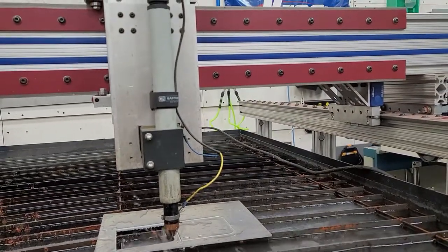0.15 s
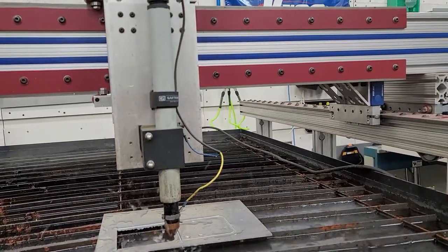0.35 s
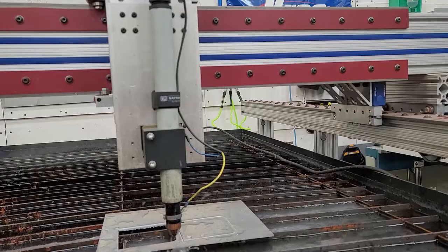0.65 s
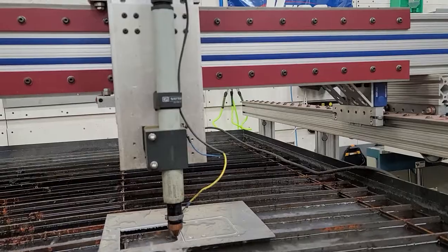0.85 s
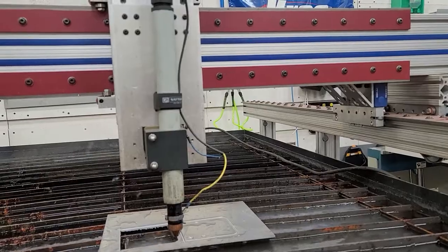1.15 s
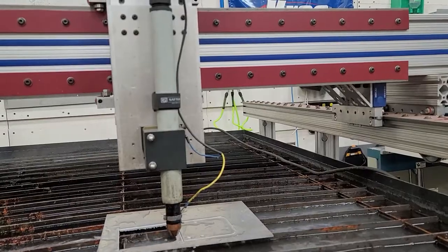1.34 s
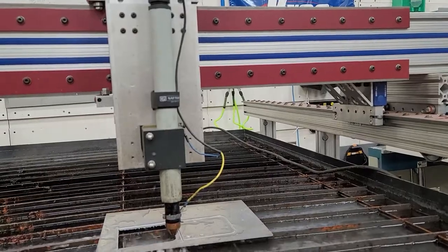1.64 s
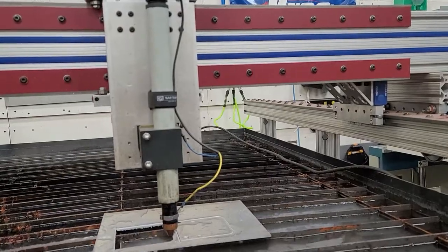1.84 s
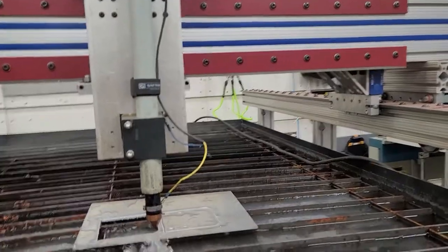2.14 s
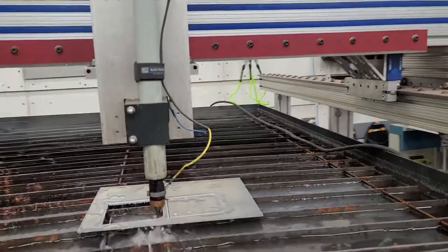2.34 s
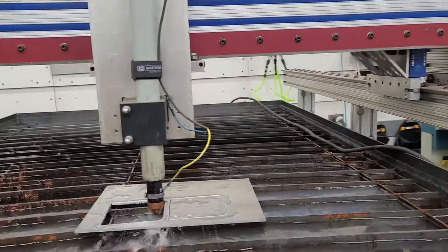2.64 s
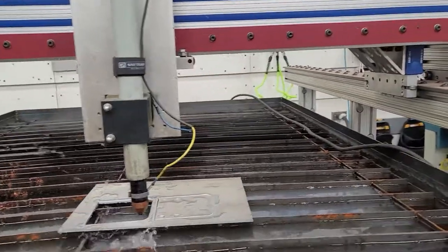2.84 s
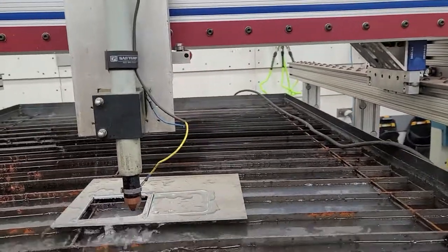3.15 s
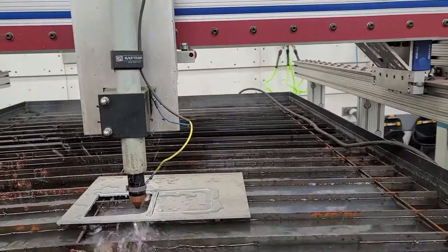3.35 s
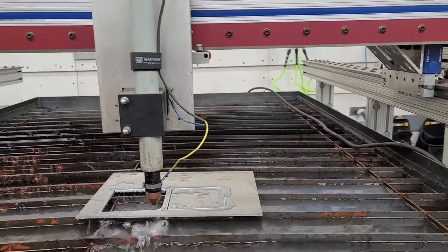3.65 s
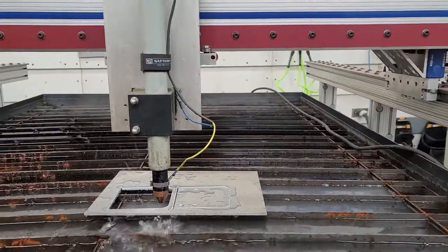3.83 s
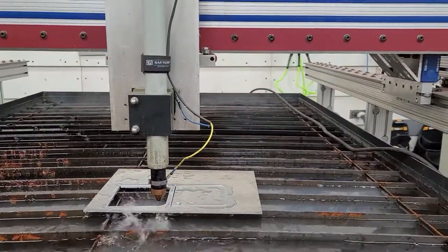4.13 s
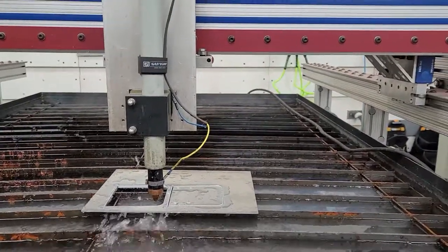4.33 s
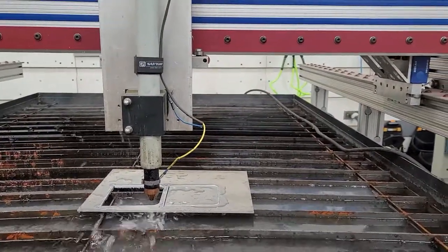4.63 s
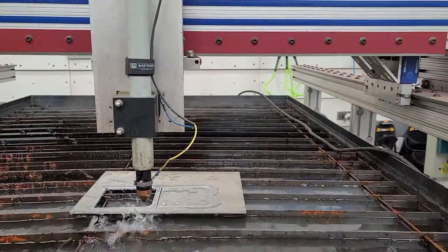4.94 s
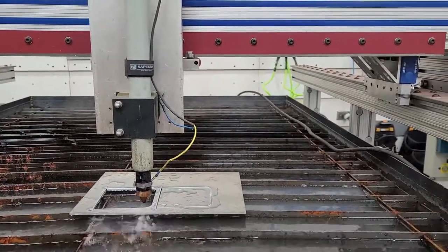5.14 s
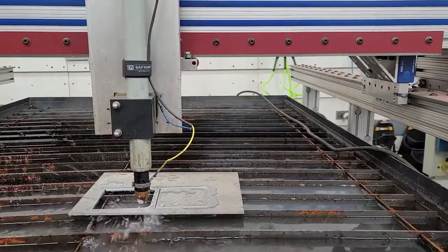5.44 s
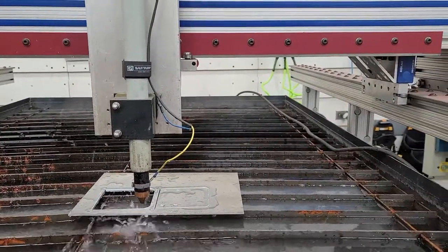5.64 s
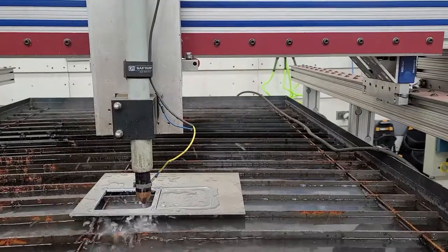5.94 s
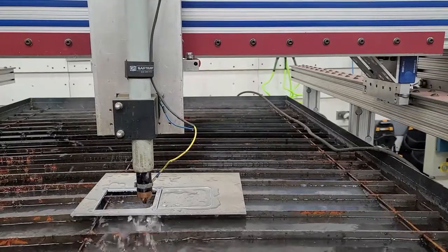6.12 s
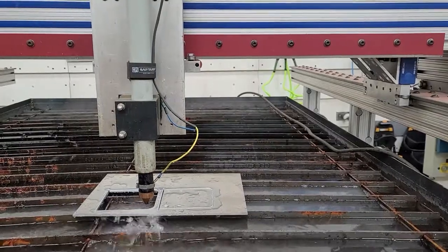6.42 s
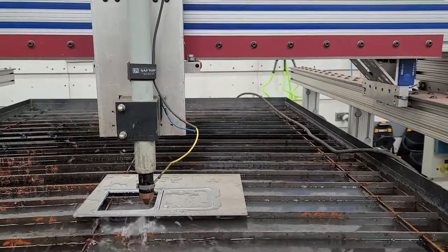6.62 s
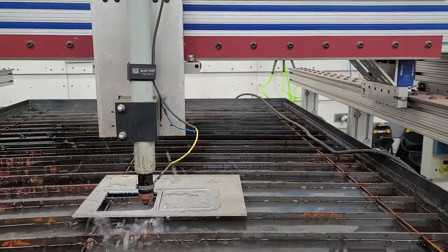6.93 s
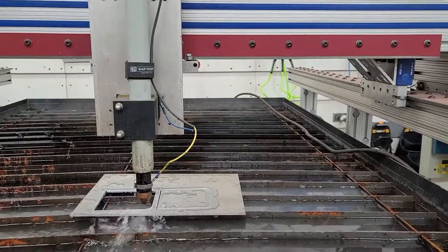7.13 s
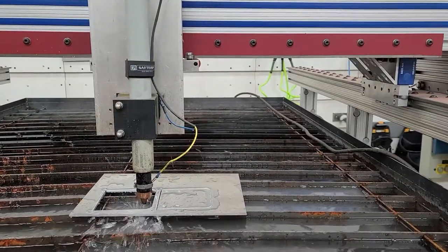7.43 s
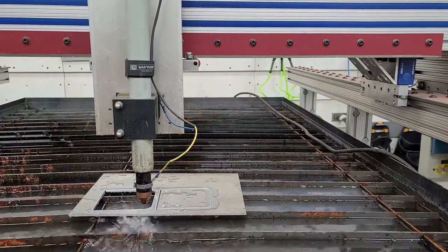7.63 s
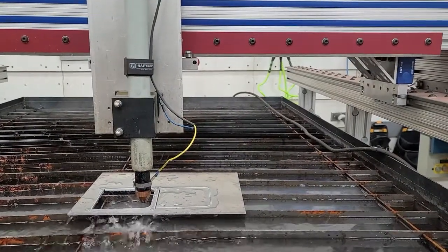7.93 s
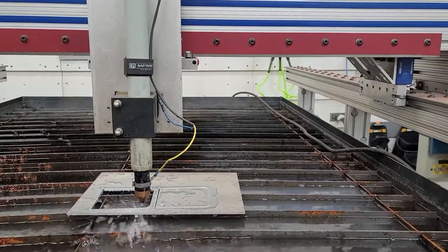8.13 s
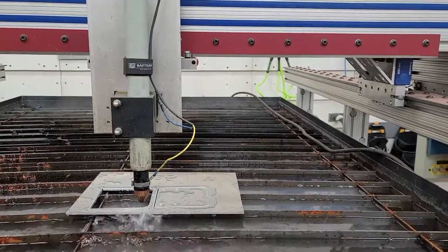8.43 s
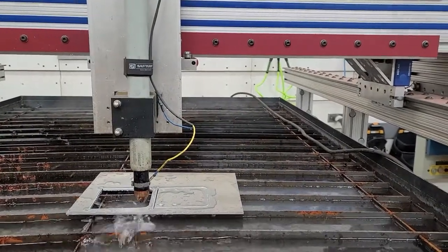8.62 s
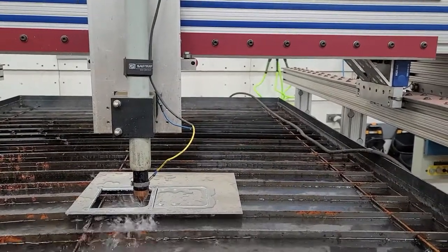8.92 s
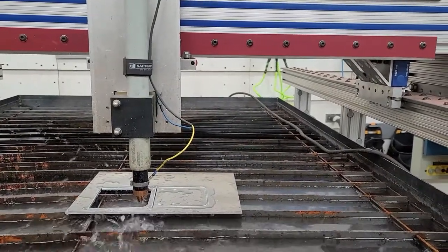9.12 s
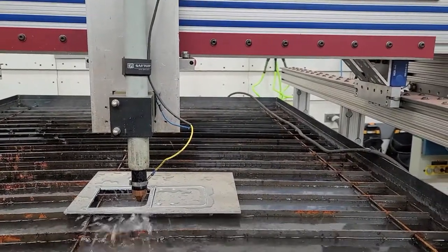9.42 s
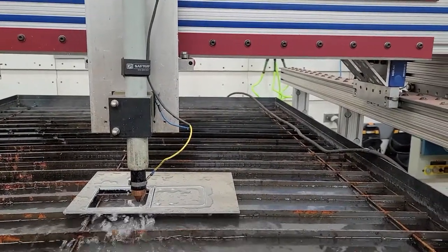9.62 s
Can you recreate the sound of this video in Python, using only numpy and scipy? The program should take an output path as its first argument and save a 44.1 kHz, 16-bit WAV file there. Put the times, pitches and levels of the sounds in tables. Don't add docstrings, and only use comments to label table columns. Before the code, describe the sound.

A constant bright roar of air with a fluttering whistle near 3 kHz and watery spray; early droplets thump the microphone on the left.

```python
import sys
import numpy as np
from scipy import signal
from scipy.io import wavfile
from scipy.ndimage import uniform_filter1d

SR = 44100
rng = np.random.default_rng(int(sys.argv[2]) if len(sys.argv) > 2 else 0)


def amplitude_ratio(level_db):
    exponent = np.asarray(level_db, float) / 20
    return 10 ** exponent


def dump_mix(stems):
    frames = np.atleast_2d(stems).T
    limited = np.clip(frames, -1, 1)
    pcm = np.round(limited * 32767).astype(np.int16)
    wavfile.write(sys.argv[1], SR, pcm)


N = 430857


def evened(x):
    return x / np.sqrt(np.mean(x ** 2) + 1e-20)


def read(points, hz):
    point_hz, value = np.transpose(points)
    return np.interp(np.log(hz + 1), np.log(point_hz + 1), value)


def follow(points, x):
    return np.interp(x, *np.transpose(points))


def humps(modes, hz):
    return sum(db / (1 + (2 * (hz - centre_hz) / width_hz) ** 2) for centre_hz, width_hz, db in modes)


def drift(shape, tall, long):
    smooth = uniform_filter1d(rng.standard_normal(shape), tall, 0)
    return evened(uniform_filter1d(smooth, long, 1))


def surges(rows, t):
    return sum(db * np.exp(-.5 * ((t - s) / half_s) ** 2) for s, db, half_s in rows)


def between_surges(rows, t):
    return np.prod([1 - np.exp(-.5 * ((t - s) / (1.3 * half_s)) ** 2) for s, db, half_s in rows], axis=0)


def drops():
    # start in seconds, lasting push, passing push (both as sample level),
    # fade of the passing push in ms, rise in ms.
    drop_hits = [
        (0.1355, -0.142, 0.068, 5.3, 0.1),
        (0.4281, 0.047, -0.047, 2.91, 2.9),
        (0.8125, -0.269, 0.248, 4.15, 0.1),
        (1.3135, -0.036, -0.02, 13.15, 0.1),
        (1.5399, 0.291, -0.198, 3.41, 0.1),
        (2.0588, -0.069, -0.079, 0.2, 0.1),
    ]
    # start in seconds, lasting push, passing push, fade in ms, rise in ms.
    slide_offs = [
        (1.586, -.012, .002, 4.1, 2.5),
        (1.642, -0.0097, .002, 4.1, 2.5),
    ]
    t = np.arange(N) / SR
    push = np.zeros((2, N))
    for start_s, lasting, passing, passing_ms, rise_ms in [*drop_hits, *slide_offs]:
        ms = np.maximum(t - start_s, 0) * 1000
        push[0] += (1 - np.exp(-ms / rise_ms)) * (lasting + passing * np.exp(-ms / passing_ms))
    cut = signal.butter(2, 29.7, "high", fs=SR, output="sos")
    return signal.sosfilt(np.vstack([cut, cut]), push)


def turbulence():
    # middle in seconds, level in dB, half-length in seconds.
    jet_gusts = [(0.12, 3.6, 0.025), (0.419, -2.6, 0.018), (1.093, 4.5, 0.012), (1.402, -2.9, 0.012),
                 (2.225, 2.8, 0.018), (2.35, 2.8, 0.025), (2.634, 1.8, 0.035), (3.163, -2.4, 0.018),
                 (3.273, 3.2, 0.012), (3.322, -4.5, 0.018), (3.442, 3.1, 0.018), (3.602, -2.9, 0.018),
                 (3.717, 4.6, 0.018), (3.851, 2.8, 0.018), (3.951, -2.7, 0.025), (4.834, -2.7, 0.012),
                 (5.044, -2.5, 0.018), (5.138, 2.0, 0.035), (5.722, 3.9, 0.018), (6.72, -3.5, 0.012),
                 (7.358, -2.3, 0.018), (7.438, 1.9, 0.025), (7.797, -3.1, 0.012), (7.927, 3.6, 0.018),
                 (8.012, 3.4, 0.012), (8.59, 3.0, 0.012), (8.64, -3.0, 0.012), (9.319, 2.8, 0.012),
                 (9.473, -2.6, 0.018), (9.708, 3.0, 0.012)]
    # middle in seconds, level in dB, half-length in seconds.
    whistle_gusts = [(0.364, 3.1, 0.018), (0.683, 2, 0.04), (1.591, -1.6, 0.07), (1.961, 2.0, 0.054),
                     (2.06, -5, 0.018), (2.549, 2.5, 0.025), (2.968, 3.3, 0.016), (3.098, 3.1, 0.018),
                     (3.183, -7, 0.018), (3.337, 5.1, 0.016), (3.931, -3, 0.025), (4.096, -3, 0.038),
                     (4.18, 4.5, 0.011), (4.3, 3.3, 0.018), (4.674, -4, 0.044), (4.884, 1.5, 0.039),
                     (5.762, 3.1, 0.018), (6.49, 4.1, 0.028), (6.864, 3, 0.03), (7.508, -4.4, 0.018),
                     (9.054, 3.6, 0.049), (9.174, -1, 0.031), (9.658, -1, 0.018), (9.738, 5, 0.02)]
    hz, t, z = signal.stft(rng.standard_normal((2, N)), SR, nperseg=256, noverlap=192)
    over_time = (1, len(t))

    jet = (1 / (1 + (12300 / (hz + 1)) ** 16))[:, None]
    spray = (1 / (1 + (6300 / (hz + 1)) ** 12))[:, None] - jet
    whistle = (1 / (1 + ((hz - 3200) / 300) ** 4))[:, None]
    splash = (1 - jet - spray) * (1 - whistle) * np.clip(hz / 4000, 0, 1)[:, None]

    jet_db = surges(jet_gusts, t)
    flutter_db = 1.6 * between_surges(jet_gusts, t) * drift(over_time, tall=1, long=12)
    whistle_flicker_db = .4 * between_surges(whistle_gusts, t) * drift(over_time, tall=1, long=30)
    whistle_db = surges(whistle_gusts, t) + whistle_flicker_db
    splash_db, spray_db = 0.61 * drift((2, len(t)), tall=1, long=40)
    spatter_db = 0.64 * drift(over_time, tall=1, long=20)
    patches_db = (.9 - .3 * jet) * drift(z.shape[1:], tall=6, long=14)

    field_db = jet * (1.2 * jet_db + flutter_db)
    field_db = field_db + spray * (0.91 * spray_db + spatter_db)
    field_db = field_db + 0.91 * splash * splash_db + 1.17 * whistle * whistle_db + patches_db
    field_db = field_db - 0.061 * (1 - jet) * (jet_db + flutter_db)
    return evened(signal.istft(z * amplitude_ratio(field_db), SR, nperseg=256, noverlap=192)[1][:, :N])


def torch():
    # time in seconds, share of the way from first to second place.
    hand_path = [(1.4, 0.018), (2.0, 0.26), (2.6, 0.89), (3.4, 0.84)]
    # time in seconds, share of the turn.
    hand_turn = [(1.5, .02), (2.4, 0.12), (2.7, 0.33), (3.0, .98)]
    # frequency in Hz, level in dB per Hz.
    left_first = [(43, -91), (366, -89.5), (1421, -70.5), (1701, -58.5), (2476, -66.5), (3122, -55.5),
                  (4027, -63.5), (5771, -64), (7020, -70), (8075, -62), (9367, -69.5), (11456, -70.5),
                  (14700, -51.5), (15633, -49.5)]
    left_second = [(43, -88.5), (323, -89.5), (624, -79.5), (904, -71.5), (1378, -66.5), (3144, -54),
                   (3984, -60.5), (5448, -60), (6998, -65), (8419, -58.5), (9539, -66), (13997, -57),
                   (14700, -53), (15633, -52)]
    right_first = [(43, -102), (215, -90.5), (323, -94), (883, -77), (2455, -72), (4436, -64), (5103, -70),
                   (6826, -61.5), (7192, -63), (7881, -78.2), (9152, -69), (10422, -65), (13500, -64.5),
                   (15633, -67)]
    right_second = [(43, -95.5), (215, -87), (301, -92), (926, -72.5), (1680, -70), (2024, -72),
                    (3122, -63), (4177, -65), (6912, -60.5), (7321, -65.5), (7967, -72.5), (9388, -66),
                    (13500, -65), (15633, -71)]
    # centre in Hz, width in Hz, level in dB.
    left_modes = [
        [(740, 56, 1.5), (902, 31, 12), (1030, 39, -8), (1200, 36, 4), (1510, 65, -8.5), (1830, 35, -11), (1880, 62, -5.2), (1930, 35, -3.9), (2106, 120, 5), (2300, 57, 0), (3430, 63, -2), (3930, 120, -6)],
        [(824, 40, -4.5), (894, 41, 6), (940, 37, 3), (1085, 46, -5.5), (1220, 48, 2), (1334, 35, -6.5), (1560, 32, -6.5), (1692, 100, 5), (1770, 35, 1), (1860, 41, -6), (1936, 65, -4.2), (2040, 35, 2), (2078, 74, 5), (2155, 50, 4), (2375, 91, -5.5), (2620, 35, 3), (2835, 115, -3.5), (3180, 99, 2), (3230, 83, 4.5), (3794, 49, 6.5), (4000, 71, -5.5), (4980, 140, -7.5)],
    ]
    right_modes = [
        [(1090, 61, -4), (1290, 47, -6), (1530, 35, -5.4), (1680, 70, 4), (1819, 35, -2.6), (1861, 50, -7.5), (2020, 100, 8), (2157, 64, 1), (2392, 89, -3.3), (3180, 214, 2), (3614, 126, -1), (3960, 220, -6)],
        [(630, 35, -7.5), (825, 35, -5.5), (1080, 36, -9), (1190, 35, 3), (1300, 78, -9), (1692, 54, 1.5), (1730, 72, 4.5), (1808, 44, 0), (1840, 35, -3.1), (1950, 42, 0), (1963, 35, -5), (1970, 35, 7), (2418, 63, -4.1), (2800, 76, -2), (2980, 98, -1.5), (3140, 63, 2.5), (3600, 87, -5), (3750, 60, 2), (4040, 123, -3), (4860, 110, -2), (7864, 110, 1), (9300, 230, 4)],
    ]
    # centre in Hz, width in Hz, level in
    # dB.
    passing_modes = [(4680, 370, 6), (7550, 700, -1.5), (10600, 1900, 1.5), (13400, 1500, 2)]
    # frequency in Hz, likeness of the two ports from 0 to 1.
    likeness = [(60, .55), (200, .75), (1000, .88), (3000, .75), (6000, .6), (9000, .52), (12000, .45),
                (15000, .62)]
    # frequency in Hz, lead in radians.
    lead_first = [(0, 0), (1720, 1.5), (1980, 0.8), (3010, 1.3), (4130, 0.5), (4820, 1.9), (6370, 1.5),
                  (7240, 5.8), (9040, 4.6), (9470, 4.8), (10200, 3.8), (11300, 4.7), (12900, 2.0),
                  (16600, 1.2)]
    lead_second = [(0, 0), (1810, 1.9), (2240, 1.2), (3010, 2.1), (4570, 2.1), (5250, 3.5), (6460, 3.7),
                   (7750, 7.9), (8790, 7.5), (9130, 6.6), (9910, 8.0), (10700, 6.8), (12400, 7.0),
                   (16600, 6.0)]

    hz, t, (a, b) = signal.stft(turbulence(), SR, nperseg=2048, noverlap=1536)
    way = np.clip(follow(hand_path, t), 0, 1)
    turn = np.clip(follow(hand_turn, t), 0, 1)

    def between(first, second, share):
        return np.outer(first, 1 - share) + np.outer(second, share)

    def colour(first, second, modes):
        first_db = read(first, hz) + humps(modes[0], hz)
        second_db = read(second, hz) + humps(modes[1], hz)
        return between(first_db, second_db, way)

    passing_db = np.outer(humps(passing_modes, hz), 4 * way * (1 - way))
    left_db = colour(left_first, left_second, left_modes) + passing_db
    right_db = colour(right_first, right_second, right_modes) + passing_db
    comb_db = [1.17 * drift(a.shape, tall=2, long=30) + 1.36 * drift(a.shape, tall=2, long=500)
               for port in range(2)]
    lead = between(follow(lead_first, hz), follow(lead_second, hz), turn)
    same = np.clip(read(likeness, hz), 0, 1)[:, None]
    right = same * a * np.exp(-1j * lead) + np.sqrt(1 - same ** 2) * b
    z = np.array([a * amplitude_ratio(left_db), right * amplitude_ratio(right_db)])
    z = z * amplitude_ratio(comb_db) * np.sqrt(SR / 2)
    z *= (hz ** 2 / np.hypot(hz ** 2, 36 ** 2))[:, None]
    return signal.istft(z, SR, nperseg=2048, noverlap=1536)[1][:, :N]


def scene():
    return torch() + drops()


def band_limit(x):
    return signal.sosfilt(signal.butter(12, 17060, fs=SR, output="sos"), x)


def record(dry):
    hz, t, z = signal.stft(dry, SR, window="cosine", nperseg=2048, noverlap=1024)
    power = abs(z) ** 2
    near = uniform_filter1d(power, size=5, axis=1)
    around = uniform_filter1d(power, size=121, axis=1)
    z *= (near > around * amplitude_ratio(-17)) | (hz < 2200)[:, None]
    z *= np.where(hz < 15720, 1, amplitude_ratio(-24) * (hz < 15860))[:, None]
    kept = signal.istft(z, SR, window="cosine", nperseg=2048, noverlap=1024)[1][:, :N]
    return band_limit(kept)


dry = scene()
out = record(dry)
dump_mix(out)
```